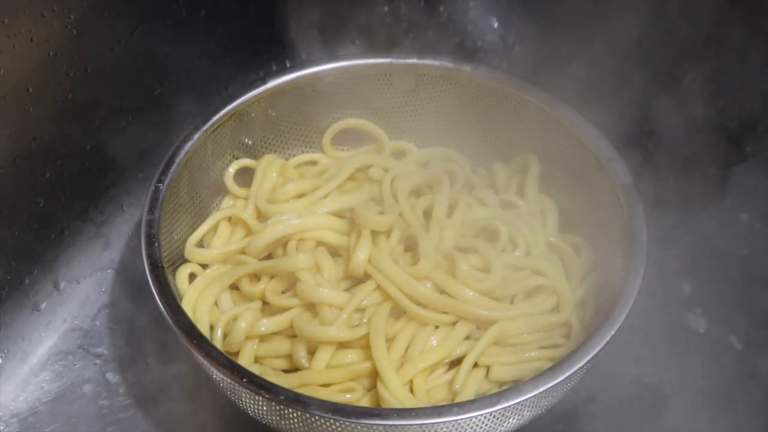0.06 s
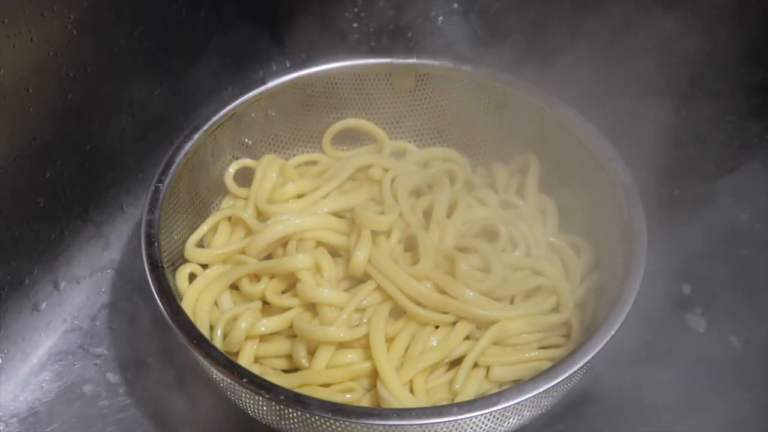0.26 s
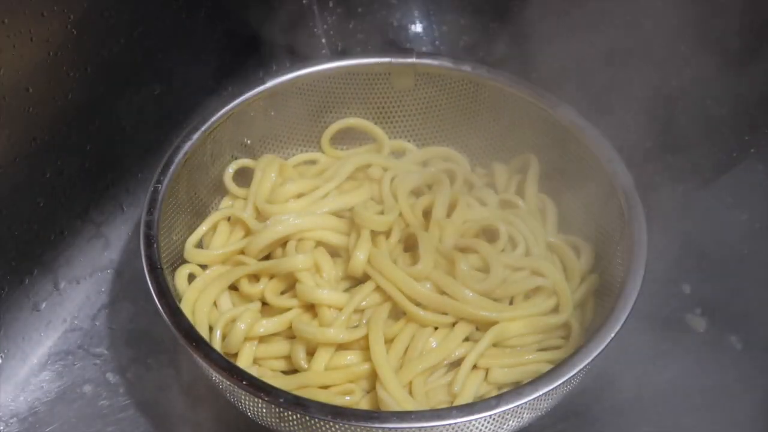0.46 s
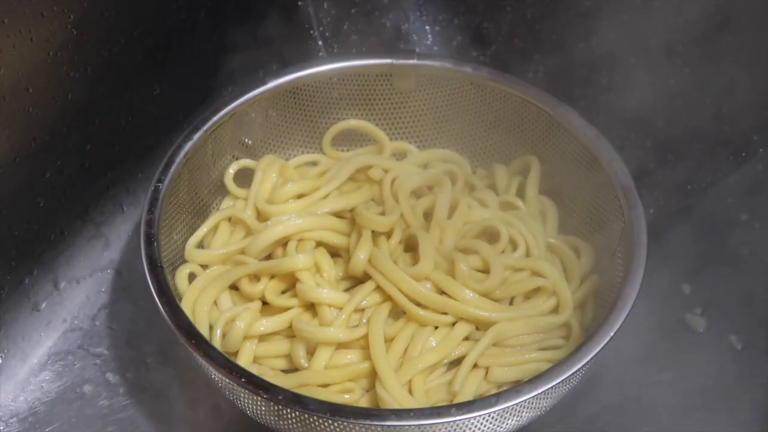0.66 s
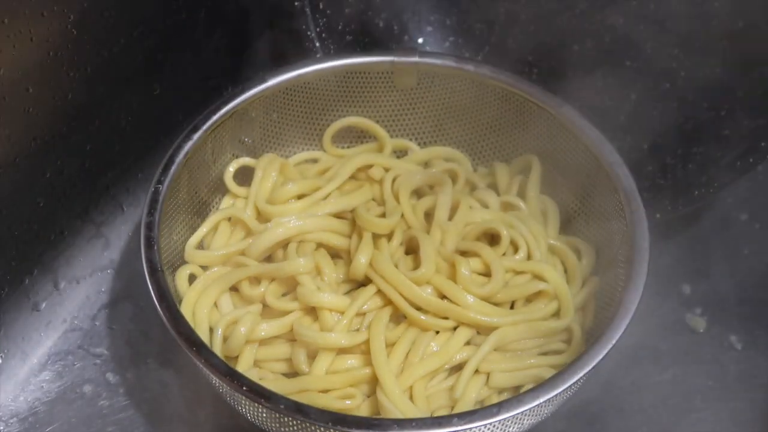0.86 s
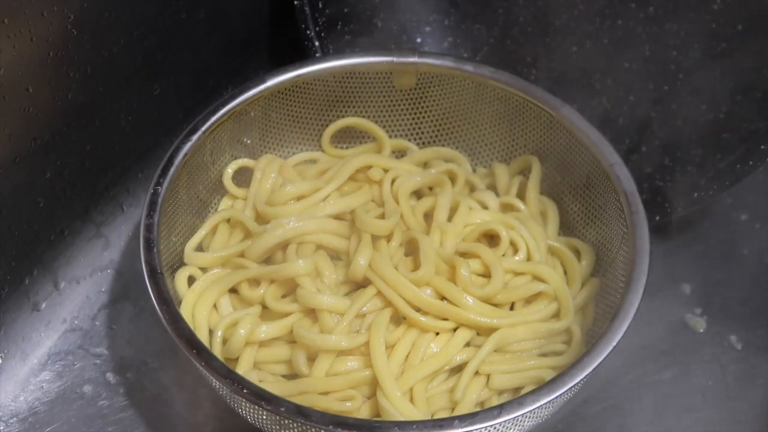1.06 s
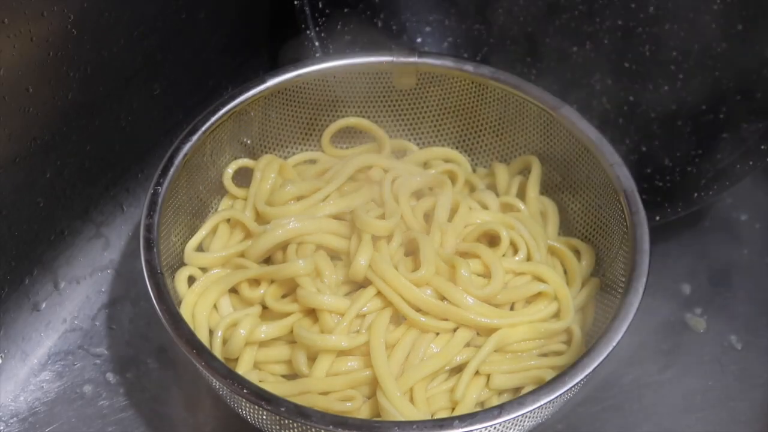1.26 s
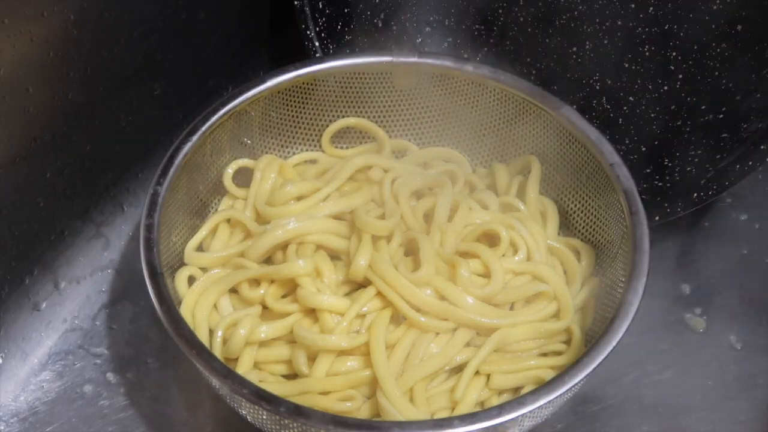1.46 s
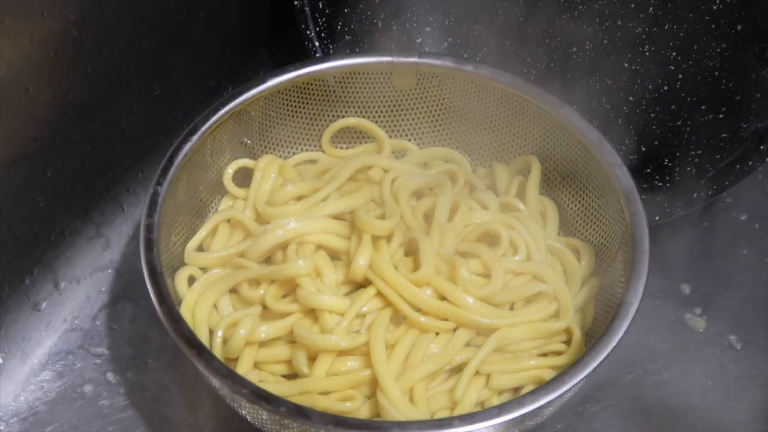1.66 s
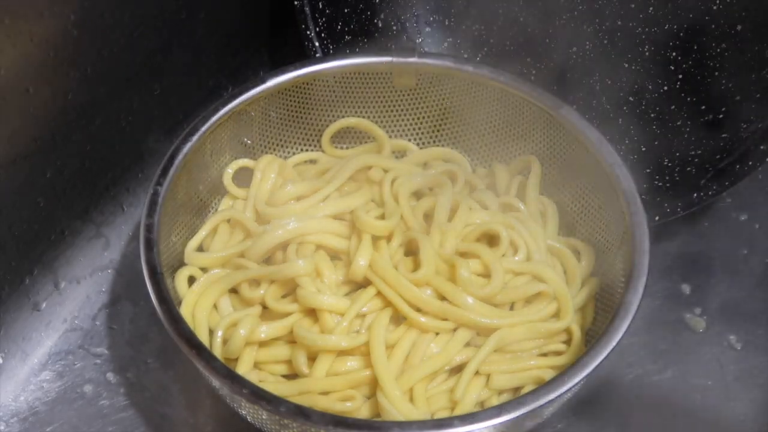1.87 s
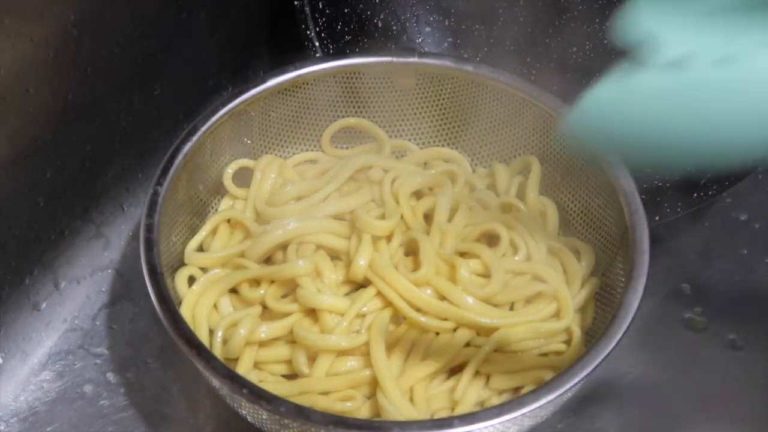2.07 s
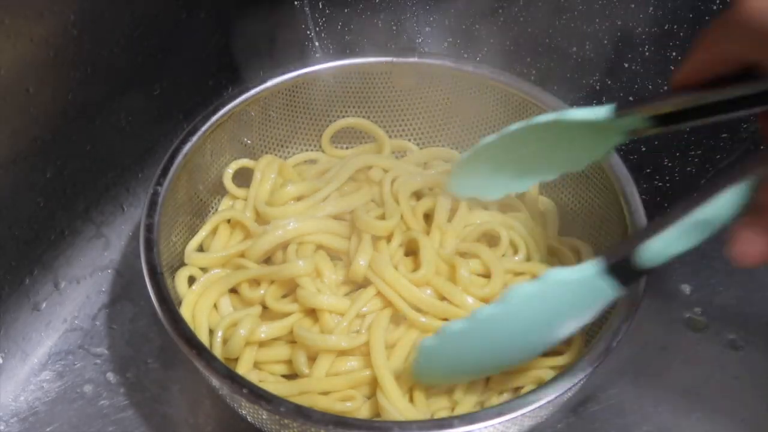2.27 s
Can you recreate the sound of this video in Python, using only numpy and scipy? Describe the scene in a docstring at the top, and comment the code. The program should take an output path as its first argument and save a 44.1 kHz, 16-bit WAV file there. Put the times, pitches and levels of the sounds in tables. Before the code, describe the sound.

Water drips and trickles into a steel sink as a pot knocks down and scrapes.

```python
"""A small kitchen, close to the steel sink, on a nearly mono microphone.
Water drains from a strainer of noodles: drops plop into the drain as ringing bubbles and tick on
the steel, and the basin and the room answer. A metal pot is set down with a knock and dragged a
short way, its slipping base driving its modes; a dull thump follows.
Underneath lie a low rumble and the drone of the drain pipe."""
import sys
import numpy as np
from scipy import signal
from scipy.fft import rfft, irfft, next_fast_len
from scipy.io import wavfile
from scipy.ndimage import uniform_filter1d

SR = 44100
rng = np.random.default_rng(int(sys.argv[2]) if len(sys.argv) > 2 else 0)


def transcribe(signal):
    """Save signal, clipped to [-1, 1], as a 16-bit WAV file at the path in sys.argv[1]."""
    frames = np.atleast_2d(signal).T
    limited = np.clip(frames, -1, 1)
    pcm = np.round(limited * 32767).astype(np.int16)
    wavfile.write(sys.argv[1], SR, pcm)


N = 101429

# stereo width of the pot and counter, close by: frequency_hz, side_minus_mid_db
CLOSE_WIDTH = [(200, -55), (680, -15), (2300, -23), (8000, -10)]
# stereo width of the water and the room: frequency_hz, side_minus_mid_db
ROOM_WIDTH = [(110, -43.5), (220, -16.5), (1250, -13.5), (4200, 1)]


def draining_water():
    """Plops, ticks and a fine trickle ring in the steel basin."""
    # drops falling into the drain: start_s, pitch_hz, level_db
    plops = [(.078, 980, -28.5), (.129, 1040, -22), (.149, 1030, -20), (.718, 817, -23.5),
             (.865, 1340, -25), (1.0, 1040, -28), (1.211, 628, -23), (1.331, 950, -24.5),
             (1.439, 1080, -18.5), (1.444, 850, -21.5), (1.454, 930, -20.5), (1.53, 720, -22),
             (1.555, 1100, -25), (1.593, 950, -22), (1.627, 754, -13), (1.703, 1000, -24),
             (1.834, 1040, -28.5), (1.844, 1036, -14.5), (1.877, 1060, -16.5), (1.891, 1140, -19.5),
             (1.923, 1060, -21.5), (1.984, 686, -16), (2.003, 1186, -25), (2.093, 1350, -25),
             (2.137, 950, -28.5), (2.16, 752, -21), (2.216, 1110, -27)]
    # drops hitting the steel: start_s, pitch_hz, level_db
    ticks = [(.148, 2490, -28), (.151, 3670, -27), (.738, 2390, -37), (1.204, 3180, -33.5),
             (1.363, 3730, -33), (1.385, 3220, -31), (1.457, 3350, -32), (1.703, 3340, -24),
             (1.709, 2020, -30.5), (1.75, 3570, -29.5), (1.845, 3610, -27), (1.881, 2300, -45),
             (1.891, 3540, -33), (1.896, 6840, -33.5), (1.959, 6950, -35), (1.976, 2420, -31.5),
             (1.986, 3800, -33), (2.097, 3640, -30.5), (2.161, 1990, -28)]
    # strength of the trickle: time_s, level_db
    flow = [(0, -52.5), (.68, -56.5), (.92, -53.5), (1.28, -63), (1.6, -54.5), (1.88, -48), (2.05, -56),
            (2.3, -49)]
    # the basin's resonances: pitch_hz, width_hz, gain_db
    basin = [(813, 150, -5.5), (1172, 88, 3), (2240, 63, 8.5), (2830, 103, 0), (3610, 25, -4.5),
             (6680, 410, 0)]
    flow_db, = curves(flow)
    trickle = amp(5.5) * bubble_cloud(count=170, hz=906, scatter=0.55, cycles=10.8, range_db=11)
    fizz = amp(-3.5) * bubble_cloud(count=1000, hz=3320, scatter=0.98, cycles=36, range_db=3.5)
    water = amp(1.5) * drops(plops, cycles=14.45) + amp(-1) * drops(ticks, cycles=36)
    water += amp(flow_db) * (trickle + fizz)
    water = filtered(water, lambda f: 0.61 + sum(amp(db) * resonance(f, hz, w) for hz, w, db in basin))
    return kitchen(water, wet_db=-1.5, width=ROOM_WIDTH)


def drops(rows, cycles):
    """Each drop makes a bubble, three fainter trailing bubbles and a small wet splash."""
    trail_s, trail_scatter, splash_t60 = 0.045, 0.23, 0.023
    tones, splashes, t = np.zeros(N), np.zeros(N), np.arange(SR // 30) / SR
    for start, hz, db in rows:
        add(tones, start, amp(db) * bubble(hz, cycles))
        for lag, detune in rng.random((3, 2)):
            trail_hz = hz * np.exp(trail_scatter * (2 * detune - 1))
            add(tones, start + trail_s * np.sqrt(lag), amp(db - 14) * bubble(trail_hz, cycles))
        add(splashes, start, amp(db - 15.5 - 60 * t / splash_t60) * rng.standard_normal(len(t)))
    return tones + filtered(splashes, lambda f: 1 / (1 + 1j * f / 3000) ** 2)


def bubble_cloud(count, hz, scatter, cycles, range_db):
    """Many small bubbles at random times, rms 1."""
    cloud = np.zeros(N)
    for when, a, b, size in rng.random((count, 4)):
        pitch = hz * np.exp(scatter * (a + b - 1))
        add(cloud, when * N / SR, amp(range_db * size ** 2) * bubble(pitch, cycles))
    return unit(cloud)


def bubble(hz, cycles):
    """A tone that rises as the bubble surfaces and dies by 60 dB over `cycles` periods."""
    t = np.arange(int(SR * cycles / hz) + 2) / SR
    age = t * hz / cycles
    return np.sin(2 * np.pi * hz * t * (1 + 0.055 * age)) * amp(-60 * age) * (1 - np.exp(-2 * t * hz))


def pot_knocks():
    """The pot lands and rings, then jolts as its base catches; each contact cracks and rings the rim."""
    # jolts during the drag: start_s, pitch_hz, level_db, crack_db
    jolts = [(.342, 170, -16, -27), (.379, 327, -14.5, -33), (0.443, 358, -11, -36.5),
             (0.487, 167, -19, -35.5)]
    land_s = 0.2142
    body = np.zeros(N)
    add(body, land_s, amp(-6.5) * pot_ring())
    for start, hz, db, _ in jolts:
        add(body, start, amp(db) * thud(hz, t60=0.078, attack_s=0.0055))
    contacts = [(land_s - 0.001, -15)] + [(start, db) for start, _, _, db in jolts]
    rim = unit(filtered(rng.standard_normal(N), lambda f: resonance(f, hz=3740, width_hz=120) ** 2))
    rim *= sum(amp(db - 14.5) * decay(start, t60=0.12) for start, db in contacts)
    cracks = sum(amp(db) * decay(start, t60=0.04) for start, db in contacts)
    sink_shiver = amp(-30.5) * decay(land_s, t60=0.25)
    return kitchen(body + rim, wet_db=-14, width=CLOSE_WIDTH) + contact_noise(cracks + sink_shiver)


def pot_ring(stiffen=1):
    """The pot's modes after one blow; `stiffen` scales their pitch."""
    # modes of the pot on the sink: pitch_hz, level_db, t60_s
    modes = [(69.3, -11, 0.36), (104.8, -14, 0.96), (170, -4.5, 0.17), (197.7, -3, 0.19),
             (298, -20.5, 0.22), (346.5, -2.5, 0.43), (527, -21, 0.25), (704, -15.5, 0.37),
             (770, -29, 0.84), (813, -18.5, 0.25), (1150, -18.5, 0.26), (1647, -26.5, 0.23),
             (2227, -18, 0.074)]
    t = np.arange(SR // 2) / SR
    return sum(amp(db - 60 * t / t60) * np.sin(2 * np.pi * hz * stiffen * t) for hz, db, t60 in modes)


def pot_drag():
    """Uneven slips of the pot's base drive its modes, the counter and a gritty hiss."""
    # course of the drag: time_s, friction_db, grit_db
    stroke = [(.335, -64, -100), (.347, -17, -37), (.372, -24.5, -45.5), (.388, -17, -38),
              (.452, -14.5, -40), (.476, -17.5, -46), (.492, -12.5, -33), (.535, -16.5, -42),
              (.57, -19.5, -65), (.612, -24.5, -52), (.67, -46.5, -71)]
    # the counter's low response: frequency_hz, level_db
    counter_spectrum = [(40, -32), (68, 1.5), (125, -14), (170, -3), (250, -10), (400, -9.5), (640, -17),
                        (1200, -27.5), (1800, -40), (3000, -83)]
    # grit under the base: frequency_hz, level_db
    grit_spectrum = [(700, -23), (1200, -0.5), (1800, -4.5), (3400, -13.5), (3780, -12.5), (4400, -18),
                     (6700, -22), (11000, -53), (14700, -70)]
    # hiss as the base bites near the end: frequency_hz, level_db
    hiss_spectrum = [(2000, -14), (5000, 6.5), (11000, -2), (13500, -9), (15000, -32)]
    slips_per_s, soften_hz = 2050, 1310
    groan_hz, groan_start_s, groan_rise_s = 353, 0.47, 0.03
    friction_db, grit_db = curves(stroke)
    t = np.arange(N) / SR
    slips = (rng.random(N) < slips_per_s / SR) * rng.uniform(-1.0, 1, N)
    # soften the slips, so the higher modes ring a little less
    force = filtered(slips, lambda f: 1 / (1 + 1j * f / soften_hz))
    ring = signal.fftconvolve(force, pot_ring(stiffen=1.01))[:N]
    ring /= np.sqrt(np.abs(uniform_filter1d(ring ** 2, size=SR // 12)) + 1e-9)  # even out the level
    # the pot's main mode keeps going once the friction takes hold
    waver = 0.61 * unit(uniform_filter1d(rng.standard_normal(N), size=SR // 40))
    groan = np.sin(2 * np.pi * groan_hz * t + waver)
    groan *= (1 + np.tanh((t - groan_start_s) / groan_rise_s)) / 2
    grain = unit(np.abs(uniform_filter1d(np.abs(slips), size=30)))
    body = amp(-6.5) * ring + amp(-3) * groan + amp(-3) * noise(counter_spectrum, grain + 0.63)
    hiss = amp(-43) * decay(start=0.508, t60=0.22) * noise(hiss_spectrum)
    grit = noise(grit_spectrum, grain + 4.6)
    return amp(friction_db) * body + amp(grit_db) * grit + hiss


def counter_thumps():
    """The counter thuds under the landing pot; later something soft thumps it and it shudders."""
    # heavy pushes into the counter: start_s, pitch_hz, level_db, t60_s
    pushes = [(0.2147, 338, 7.5, 0.016), (1.0444, 211, 5, 0.016), (1.0724, 251, -10.5, 0.043)]
    # the counter's shudder: frequency_hz, level_db
    shudder_spectrum = [(40, -27), (130, -1), (240, 4), (450, 0), (820, -7.5), (1100, -17.5), (2300, -32),
                        (6900, -65), (14000, -65.5)]
    thump_s, tap_hz, tap_t60 = 1.044, 5000, 0.016
    blows, t = np.zeros(N), np.arange(SR // 8) / SR
    add(blows, thump_s, amp(-35.5 - 60 * t / tap_t60) * np.sin(2 * np.pi * tap_hz * t))
    for start, hz, db, t60 in pushes:
        add(blows, start, amp(db) * thud(hz, t60, attack_s=0.00085))
    crack = contact_noise(amp(-33) * decay(thump_s, t60=0.13))
    shudder = amp(-18.5) * decay(thump_s + 0.004, t60=0.39) * noise(shudder_spectrum)
    return kitchen(blows, wet_db=-14, width=CLOSE_WIDTH) + crack + shudder


def thud(hz, t60, attack_s):
    """One damped mode with a rounded onset."""
    t = np.arange(SR // 8) / SR
    return amp(-60 * t / t60) * np.sin(2 * np.pi * hz * t) * (1 - np.exp(-t / attack_s))


def contact_noise(envelope):
    """The broadband crack of surfaces meeting."""
    # colour of the crack: frequency_hz, level_db
    spectrum = [(60, -29), (300, -14.5), (1200, -2), (2500, -12.5), (4000, -20.5), (7000, -20.5),
                (11000, -36), (15000, -59.5)]
    return envelope * noise(spectrum)


def drain_pipe():
    """The pipe drones at its lowest resonance and, more faintly, at three times that pitch."""
    # strength of the drone: time_s, level_db
    swell = [(0, -40.5), (1.2, -48.5), (1.55, -38.5), (2.3, -37)]
    level_db, = curves(swell)
    mode = lambda f, k: resonance(f, hz=k * 97.1, width_hz=k * 29.4) ** 2
    drone = filtered(rng.standard_normal(N), lambda f: mode(f, 1) + amp(-15) * mode(f, 3))
    return amp(level_db) * unit(drone)


def room_tone():
    """The kitchen's steady low rumble."""
    # colour of the rumble: frequency_hz, level_db
    spectrum = [(25, -2), (45, 0), (85, -2), (180, -15.5), (350, -12), (600, -20.5), (1160, -28),
                (1520, -30.5), (2270, -37.5), (6800, -46.5), (10700, -54), (14700, -79.5)]
    return amp(-36) * noise(spectrum, width=ROOM_WIDTH)


def kitchen(x, wet_db, width):
    """Direct sound plus a diffuse tail in which the bass lasts longest."""
    # the room's decay: frequency_hz, t60_s
    reverb_times = [(100, 0.35), (800, 0.1), (3000, 0.046), (10000, 0.06)]
    hz, t, spectra = signal.stft(rng.standard_normal((2, SR // 3)), SR, nperseg=256)
    tail = signal.istft(spectra * amp(-60 * t / along(reverb_times, hz)[:, None]), SR, nperseg=256)[1]
    tail = np.pad(tail / np.linalg.norm(tail[0]), ((0, 0), (SR // 400, 0)))  # arrives 2.5 ms late
    return x + amp(wet_db) * spread(signal.fftconvolve(x[None], tail, axes=1)[:, :N], width)


def amp(db):
    """Decibels to amplitude."""
    return 10 ** (np.asarray(db) / 20)


def unit(x):
    """Scale to rms 1."""
    return x / np.sqrt(np.mean(x ** 2) + 1e-20)


def along(points, hz):
    """Interpolate (frequency_hz, value) points on a log axis."""
    f, values = np.transpose(points)
    return np.interp(np.log(hz + 1), np.log(f + 1), values)


def curves(rows):
    """One value per sample for each column after the time."""
    times, *columns = np.transpose(rows)
    return [np.interp(np.arange(N) / SR, times, column) for column in columns]


def filtered(x, response):
    """Pass x through a complex response of frequency."""
    size = next_fast_len(N + SR // 2)
    return irfft(rfft(x, size) * response(np.fft.rfftfreq(size, 1 / SR)), size)[..., :N]


def resonance(f, hz, width_hz):
    """Causal response of one resonance."""
    return 1j * f * width_hz / (hz * hz - f * f + 1j * f * width_hz)


def spread(pair, width):
    """Two unrelated signals become left and right, alike in the bass."""
    turn = lambda f: np.arctan(amp(along(width, f)))
    mid, side = filtered(pair, lambda f: np.array([np.cos(turn(f)), np.sin(turn(f))]))
    return np.array([mid + side, mid - side])


def noise(spectrum, gate=1, width=CLOSE_WIDTH):
    """Coloured stereo noise of rms 1."""
    pair = filtered(gate * rng.standard_normal((2, N)), lambda f: amp(along(spectrum, f)))
    return unit(spread(pair, width))


def decay(start, t60):
    """Envelope with a fast attack and an exponential release."""
    t = np.maximum(np.arange(N) / SR - start, 0)
    return (1 - np.exp(-t / 0.0005)) * amp(-60 * t / t60)


def add(out, start, x):
    """Mix x into out from `start` seconds."""
    i = int(np.clip(round(start * SR), 0, N - 1))
    out[..., i:i + x.shape[-1]] += x[..., :N - i]


def scene():
    """From the microphone, the drain lies a little to the right of the pot."""
    # balance of the water: frequency_hz, left_minus_right_db
    pan = [(350, 3.5), (720, -3), (1800, 1.5)]
    water = filtered(draining_water(), lambda f: amp(along(pan, f) * np.array([[.5], [-.5]])))
    return water + pot_knocks() + counter_thumps() + pot_drag() + drain_pipe() + room_tone()


def record(dry):
    """A microphone with two closely spaced ports, a bass cut, a soft overload and a band limit."""
    # phase between the ports: frequency_hz, left_lead_rad
    port_phase = [(600, 0), (3500, 0.41), (6000, 1.66), (10500, 2.1)]
    low_hz, top_hz = 57.5, 14800
    ports = lambda f: np.exp(1j * along(port_phase, f) * np.array([[.5], [-.5]]))
    low_cut = lambda f: (f * f / (f * f - low_hz ** 2 - 1j * np.sqrt(2) * f * low_hz)) ** 2
    picked_up = filtered(dry, lambda f: ports(f) * low_cut(f))
    limited = picked_up / (1 + np.abs(picked_up) ** 8) ** (1 / 8)
    return filtered(limited, lambda f: f < top_hz)


dry = scene()
out = record(dry)
transcribe(out)
```